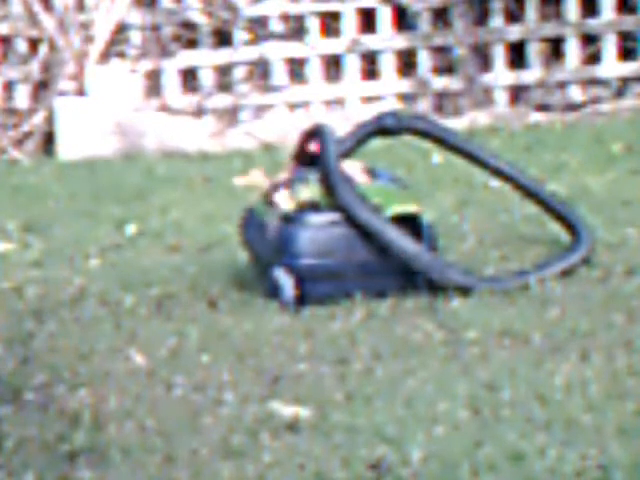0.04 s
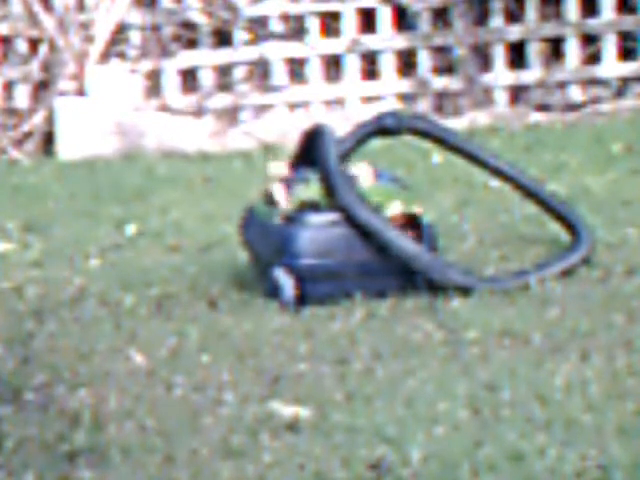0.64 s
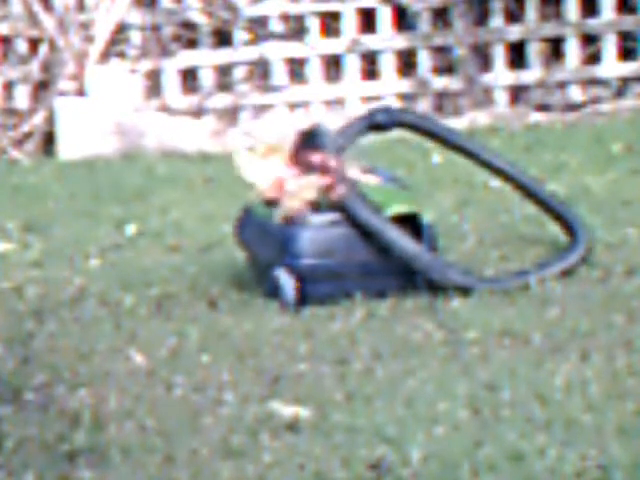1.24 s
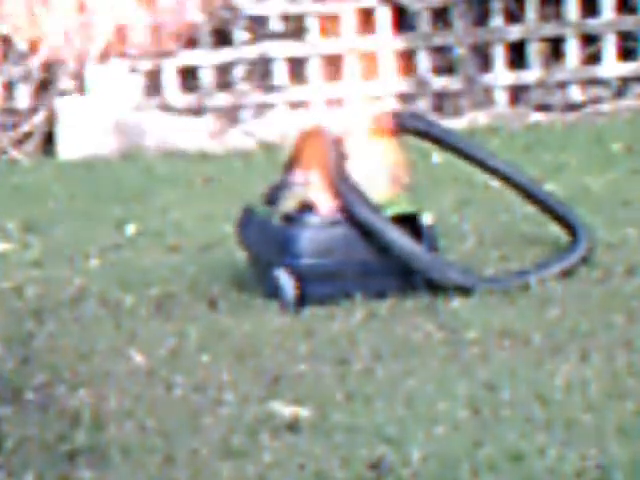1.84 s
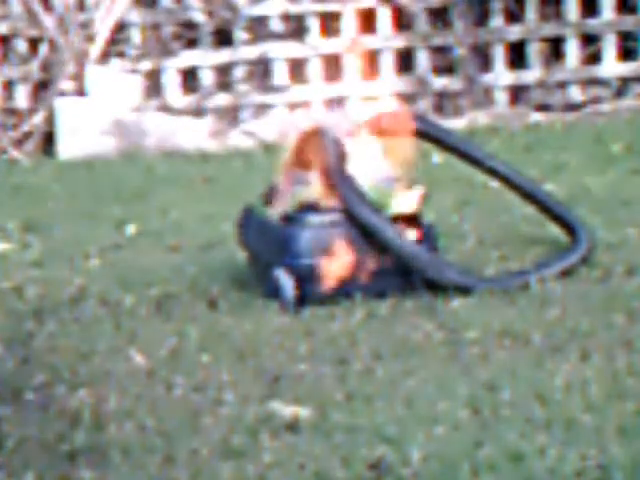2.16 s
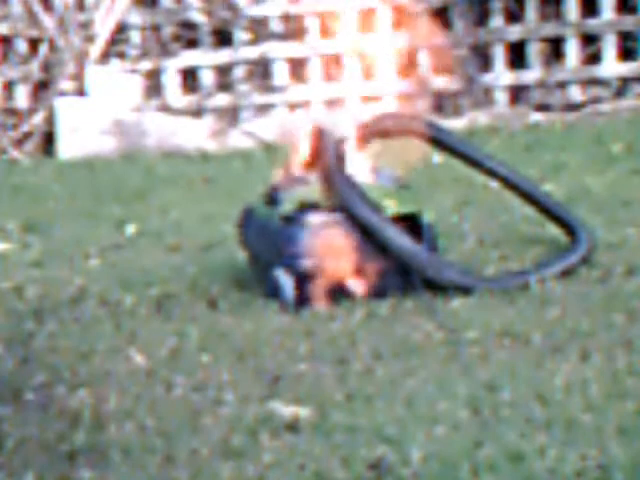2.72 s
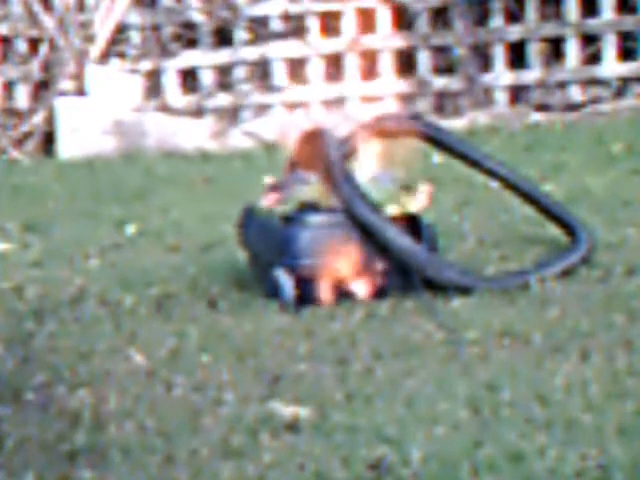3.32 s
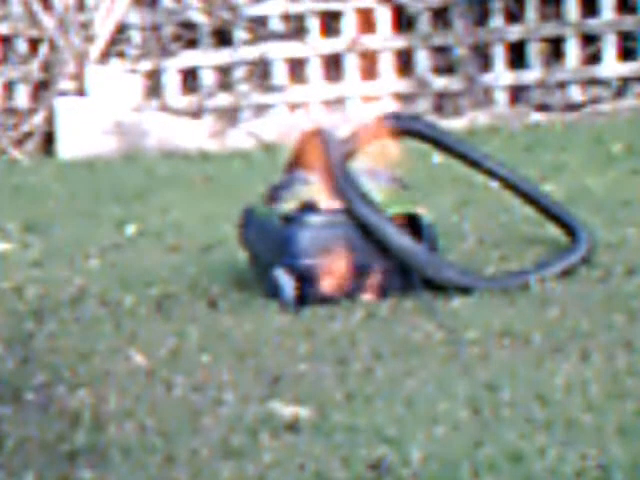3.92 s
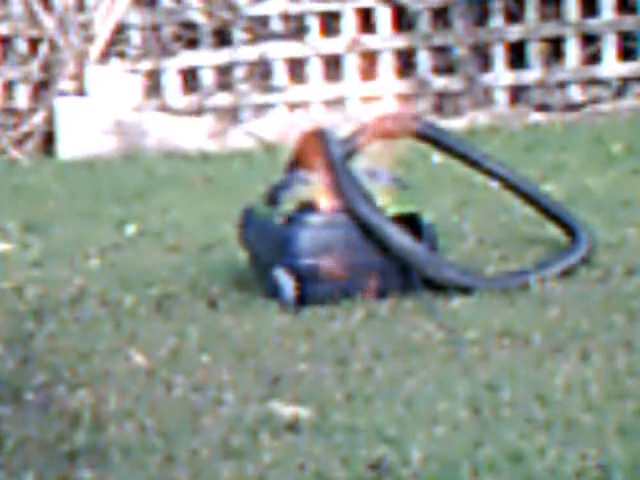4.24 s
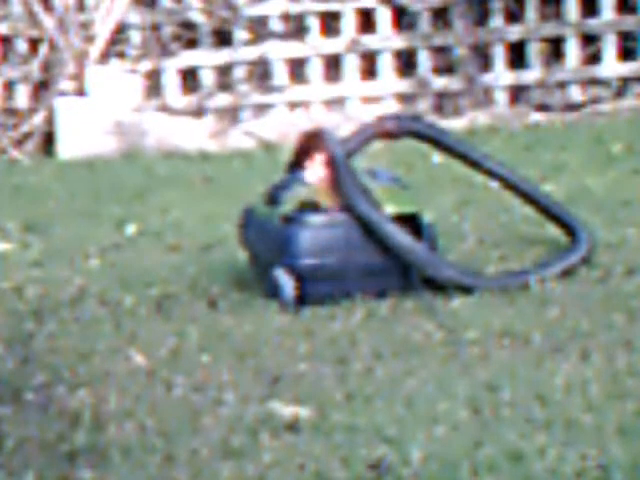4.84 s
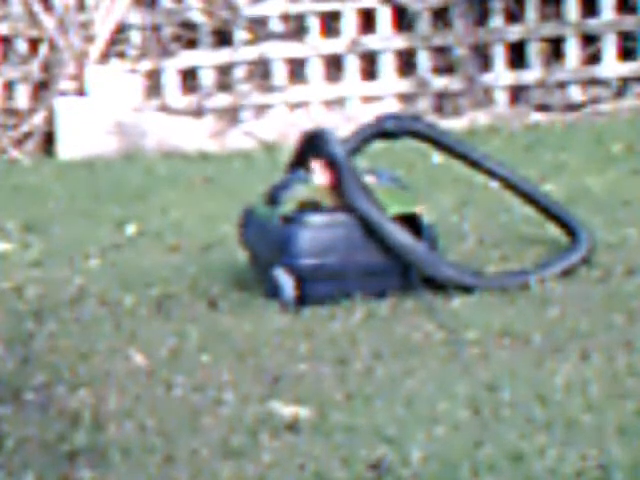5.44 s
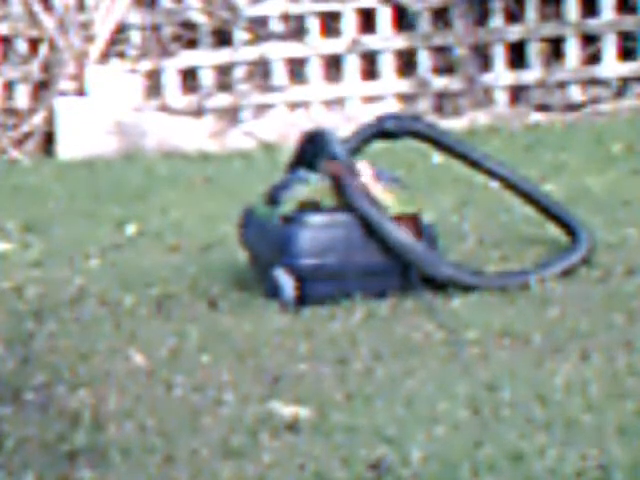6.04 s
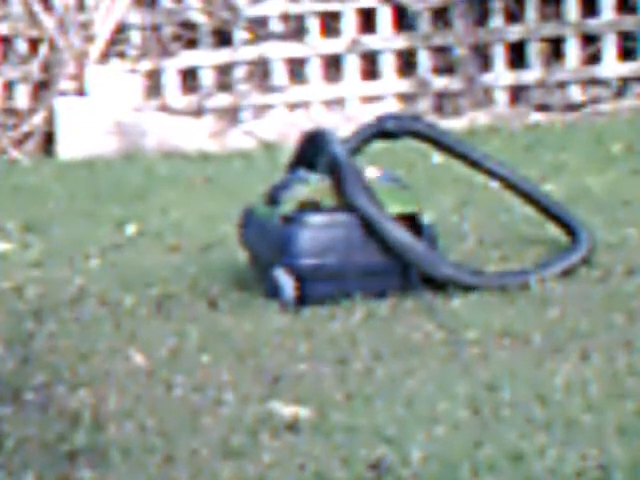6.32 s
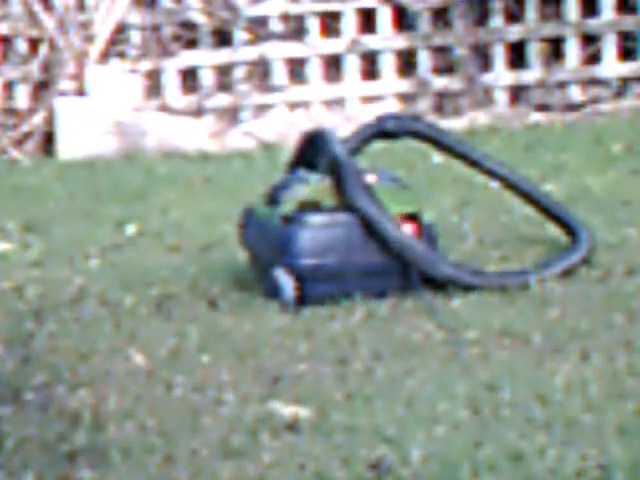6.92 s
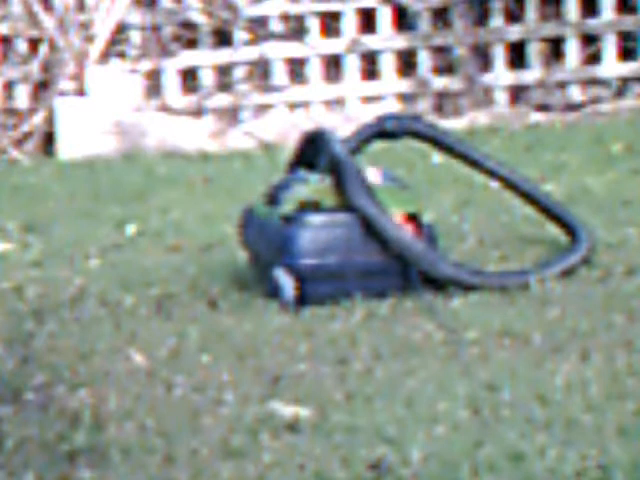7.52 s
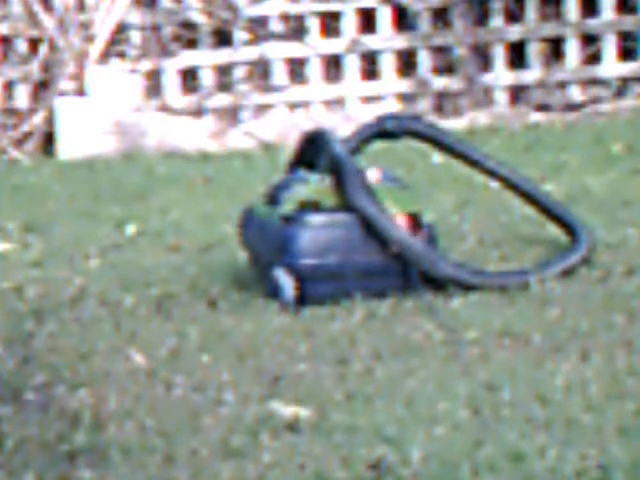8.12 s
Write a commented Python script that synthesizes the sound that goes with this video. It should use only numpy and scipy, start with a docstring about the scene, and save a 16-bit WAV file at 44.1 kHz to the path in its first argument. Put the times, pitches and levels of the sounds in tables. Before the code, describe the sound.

On a quiet lawn, a vacuum cleaner gives a small, sharp plastic pop and its motor winds up to a thin whine, with air rushing through the hose. Burning vapour swells twice into a low, buffeting roar, with hissing gas and a few soft whumps. The fire dies away while the motor keeps running. A small camera microphone adds a gritty fizz to the dry sound.

```python
"""Burning petrol vapour roars, low and buffeting, in a vacuum cleaner that has sucked it in on a lawn.
After a small pop the motor winds up, air rushes through the hose and the draught fans the flame.
Gas hisses at the opening, pockets of vapour catch with soft whumps, and the fire dies away while
the motor whines on. A quiet garden bed lies underneath. A small camera's low sample rate, with
each sample held, puts a gritty fizz on top."""
import sys
import numpy as np
from scipy import signal
from scipy.io import wavfile
from scipy.ndimage import uniform_filter1d

SR = 44100
rng = np.random.default_rng(int(sys.argv[2]) if len(sys.argv) > 2 else 0)


def materialize(psi):
    """Save the field psi as 16-bit PCM at rate SR to the path in sys.argv[1].

    A 1-D psi becomes a single channel; in a 2-D psi each row is a channel.
    """
    bounded = np.clip(np.atleast_2d(psi).T, -1, 1)
    quanta = np.round(bounded * 32767).astype(np.int16)
    wavfile.write(sys.argv[1], SR, quanta)


N = 360297


def from_db(db):
    """Decibels to gain."""
    return 10 ** (np.asarray(db) / 20)


def unit_rms(x):
    """Scale to rms 1."""
    return x / np.sqrt(np.mean(x ** 2) + 1e-20)


def envelope(rows, before=None):
    """Straight lines through (time, value) rows; before is the value ahead of the first row."""
    times, values = np.transpose(rows)
    return np.interp(np.arange(N) / SR, times, values, left=before)


def drift(rate_hz):
    """Smooth random modulation, rms about 1."""
    step, run_in = 40, 2000
    pole = np.exp(-2 * np.pi * rate_hz * step / SR)
    white = rng.standard_normal(N // step + run_in + 2)
    slow = signal.lfilter([1], [1, -2 * pole, pole * pole], white)[run_in:]
    return np.interp(np.arange(N) / step, np.arange(len(slow)), unit_rms(slow))


def resonate(x, hz, width_hz):
    """A resonant band-pass with gain 1 at its peak."""
    r, w = np.exp(-np.pi * width_hz / SR), 2 * np.pi * hz / SR
    return signal.lfilter(np.array([1, 0, -1]) * (1 - r * r) / 2, [1, -2 * r * np.cos(w), r * r], x)


def ring(clicks, hz, t60):
    """A unit click sets off a decaying sine of height 1."""
    r, w = np.exp(-np.log(1000) / (t60 * SR)), 2 * np.pi * hz / SR
    return signal.lfilter([0, np.sin(w)], [1, -2 * r * np.cos(w), r * r], clicks + 1e-18)


def narrow_noise(hz, width_hz):
    """Pitched noise: two passes through one resonance, rms 1."""
    return unit_rms(resonate(resonate(rng.standard_normal(N), hz, width_hz), hz, width_hz))


def eddies(spectrum, flicker_db, flicker_hz, tilt_db=0, bass_db=0, pivot_hz=80, bass_hz=55):
    """Quarter-octave noise bands, each flickering alone, with a tilt per octave and a bass shelf."""
    edges = np.geomspace(18, 2900, 30)
    points_hz, points_db = np.transpose(spectrum)
    white = rng.standard_normal((2, N + SR // 2))
    out, power = 0, 0
    for k, (low, high) in enumerate(zip(edges, edges[1:])):
        hz = np.sqrt(low * high)
        band_pass = signal.butter(3, [low, high], "band", fs=SR, output="sos")
        band = signal.sosfilt(band_pass, white[k % 2])[-N:]
        band *= from_db(np.interp(np.log(hz), np.log(points_hz), points_db))
        octaves = np.clip(np.log2(hz / pivot_hz), -1, 2)
        colour_db = tilt_db * octaves + bass_db * (hz < bass_hz)
        out += band * from_db(flicker_db * drift(flicker_hz) + colour_db)
        power += np.mean(band ** 2)
    return out / np.sqrt(power)


# Spectrum of the outdoor bed: f/Hz, relative density/dB
GARDEN_SPECTRUM = [(12, -33), (20, -10), (43, 3), (60, -7.5), (130, -1), (205, -9), (343, -11.5),
                   (373, -17), (405, -7.5), (540, -9), (611, -8), (721, -14.5), (1210, -23), (2190, -24),
                   (2750, -26.5), (3580, -69), (6050, -120)]
# Envelope of a faint drone, strongest at the start: t/s, level/dB
DRONE_ENVELOPE = [(0, -52), (.28, -48.5), (.6, -58), (1, -61), (2, -56), (2.6, -69)]


def garden(bed_db=-43.5):
    """A soft, dark outdoor bed with a narrow, hollow drone."""
    drone = from_db(envelope(DRONE_ENVELOPE)) * narrow_noise(hz=541, width_hz=66)
    return from_db(bed_db) * eddies(GARDEN_SPECTRUM, flicker_db=-0.55, flicker_hz=5.5) + drone


def scatter(x, level_db=-21, t60=.18):
    """Fence and shrubs throw back a faint, dense tail."""
    t = np.arange(SR // 2) / SR
    tail = rng.standard_normal(len(t)) * np.exp(-np.log(1000) * t / t60)
    return from_db(level_db) * signal.fftconvolve(x, tail / np.linalg.norm(tail))[:N]


# Pop cues: t/s, snap level/dB, knock level/dB
POP_CUES = [(.229, -41.5, -45), (1.631, -33, -70), (1.6339, -16.5, -60), (1.6375, -21, -60),
            (1.6485, -37, -36), (1.687, -40, -40), (2.156, -49, -25.5), (2.179, -40, -50)]
# Modes of the plastic shell: f/Hz, relative level/dB, t60/s
SHELL_MODES = [(1016, -6.5, 0.033), (1170, -0.5, 0.02), (1470, -9, 0.0073), (2200, 3.5, 0.01),
               (2580, -21, .008)]


def pops(low_cut_hz=720):
    """Each pop snaps in the thin plastic shell and knocks the hollow drum behind it."""
    snaps, knocks = np.zeros((2, N))
    for at_s, snap_db, knock_db in POP_CUES:
        at = round(at_s * SR)
        snaps[at], knocks[at] = from_db(snap_db), from_db(knock_db)
    shell = sum(from_db(db) * ring(snaps, hz, t60) for hz, db, t60 in SHELL_MODES)
    # a small shell radiates no bass
    shell = signal.sosfilt(signal.butter(4, low_cut_hz, "high", fs=SR, output="sos"), shell)
    return shell + ring(knocks, hz=570, t60=0.06)


def motor_speed(on_s=1.63, spin_up_s=.545):
    """Share of full speed: a quick climb after switch-on, then levelling off."""
    return 1 - np.exp(-np.maximum(np.arange(N) / SR - on_s, 0) / spin_up_s)


# Tones of motor and fan at full speed: f/Hz, relative level/dB
MOTOR_TONES = [(1066, -64), (1938, -61.5), (2353, -74), (2540, -64), (3200, -60)]
# Casing resonances that lift a tone as it sweeps through: f/Hz, width/Hz, boost/dB
CASING_RESONANCES = [(738, 78, 21), (1550, 40, 12), (1820, 39, 12), (1970.5, 37, 13)]


def motor(level_db=-1.0, strain_db=2.0, wobble=0.00342, rough_db=3.0, sing_speed=.585):
    """The whine rises with speed, is louder under the strain of winding up, and rings the casing."""
    speed, whine = motor_speed(), 0
    travel = np.cumsum(speed * (1 + wobble * drift(20.1))) / SR
    for full_hz, db in MOTOR_TONES:
        lift_db = sum(boost_db / (1 + ((full_hz * speed - hz) / width) ** 2)
                      for hz, width, boost_db in CASING_RESONANCES)
        whine += from_db(db + lift_db + rough_db * drift(30)) * np.sin(2 * np.pi * full_hz * travel)
    # the tones break out as the motor passes sing_speed
    singing = .5 + .5 * np.tanh((speed - sing_speed) / 0.011)
    return np.sqrt(2) * from_db(level_db + strain_db * (1 - speed)) * singing * whine


# Air columns of hose and drum: f/Hz, width/Hz, relative level/dB
HOSE_RESONANCES = [(54.7, 9.4, 4.5), (83.5, 9.1, 2), (117, 5.5, 2), (272.6, 22.5, 3.5), (360.2, 7.7, 6.5),
                   (468, 21, -1), (578, 14, -11), (681, 29, -2), (801, 16, -36)]


def hose(x):
    """The hollow colour that hose and drum add to a sound passing through."""
    return sum(from_db(db) * resonate(x, hz, width) for hz, width, db in HOSE_RESONANCES)


# Resonances of the opening: f/Hz, width/Hz, relative level/dB
OPENING_RESONANCES = [(1026, 34, -6), (1393, 300, -0.5), (1908, 460, 2.5), (2165, 116, -4.5),
                      (2525, 230, -7)]
# Envelope of the burning gas's hiss: t/s, level/dB
HISS_ENVELOPE = [(2.08, -76), (2.16, -57), (2.4, -48), (2.68, -36.5), (3.15, -46.5), (3.65, -47.5),
                 (4.58, -36), (5.7, -42.5), (6.3, -62.5), (7.6, -56)]


def gas_hiss():
    """Burning gas hisses in the resonances of the opening."""
    hiss = sum(from_db(db) * narrow_noise(hz, width) for hz, width, db in OPENING_RESONANCES)
    return from_db(envelope(HISS_ENVELOPE, before=-120)) * unit_rms(hiss)


def warmth(warming_s=0.84):
    """The machine's heat lags behind the burning gas."""
    gas = from_db(envelope(HISS_ENVELOPE, before=-120))
    pole = np.exp(-1 / (warming_s * SR))
    return signal.lfilter([1 - pole], [1, -pole], gas)


# Spectrum of the air rush: f/Hz, relative density/dB
AIR_SPECTRUM = [(30, 4.5), (60, -15), (150, -1.5), (200, -5), (290, -2), (450, -2.5), (620, -2.5),
                (880, -4), (1020, -15), (1180, -18.5), (1400, -10), (1700, -14), (1980, -8), (2750, -16)]


def airflow(suction_db=-38.5, speed_power=1.47, updraught_db=1.0, hose_db=-4, flutter_db=0.95):
    """Motor and heat draw air through hose and fan; the rush and the gas hiss flutter together."""
    air = eddies(AIR_SPECTRUM, flicker_db=0.97, flicker_hz=21)
    air += from_db(hose_db) * hose(air)
    suction = from_db(suction_db) * motor_speed() ** speed_power
    draught = np.hypot(suction, from_db(updraught_db) * warmth())
    rush = draught * air + gas_hiss()
    return from_db(flutter_db * drift(58)) * rush


# Bass-heavy spectrum of the fire: f/Hz, relative density/dB
FIRE_SPECTRUM = [(18, -30), (28, -2), (38, -2.5), (52, -1), (125, -3.5), (165, -5.5), (220, -12),
                 (310, -18.5), (430, -21.5), (550, -26), (700, -33), (1000, -36), (1150, -40.5),
                 (2750, -72)]


def rumble(tilt_db, bass_db=0, hose_db=-2.5, window_s=.12):
    """Turbulent burning, coloured by the hose; slow swells are levelled out, the fast grain stays."""
    roar = eddies(FIRE_SPECTRUM, flicker_db=.5, flicker_hz=8.8,
                  tilt_db=tilt_db, bass_db=bass_db, pivot_hz=83)
    roar += from_db(hose_db) * hose(roar)
    power = np.abs(uniform_filter1d(roar ** 2, int(window_s * SR)))
    return roar / np.sqrt(power + 1e-9)


# Whump cues: peak t/s, level/dB, swell width/s, tilt/(dB per octave)
WHUMP_CUES = [(1.0, -48.5, .25, 2.5), (2.355, -18, 0.046, -4), (3.79, -17, .05, -6), (5.27, -14, .06, -8),
              (6.69, -36, .1, 4)]


def whumps(fade_ratio=1.4):
    """Pockets of vapour catch: each swells, fades a little more slowly and has its own colour."""
    t, power, weighted_tilt = np.arange(N) / SR, 1e-12, 0
    for peak_s, db, swell_s, tilt_db in WHUMP_CUES:
        width_s = np.where(t < peak_s, swell_s, swell_s * fade_ratio)
        bell = (from_db(db) * np.exp(-.5 * ((t - peak_s) / width_s) ** 2)) ** 2
        power += bell
        weighted_tilt += tilt_db * bell
    return np.sqrt(power) * rumble(weighted_tilt / power)


# Envelope of the roar, which swells twice and burns out: t/s, relative level/dB
ROAR_ENVELOPE = [(1.63, -68), (1.72, -43), (2.05, -37), (2.24, -30), (2.38, -18.5), (2.78, -13),
                 (3.02, -14.5), (3.22, -20), (4.0, -12), (4.45, -11), (5.0, -14.5), (5.7, -21.5),
                 (6.07, -29), (6.4, -55)]


def flame(level_db=-0.5, calm_bass_db=2.5, bass_loss_db=7, neutral_gap_db=27.5, tilt_per_db=0.1358):
    """The roar is deep and dull while the gas is calm and brightens as rushing gas tears at it."""
    roar_db, hiss_db = envelope(ROAR_ENVELOPE, before=-120), envelope(HISS_ENVELOPE)
    # the more hiss beside the roar, the brighter the flame
    tilt_db = tilt_per_db * (hiss_db - roar_db + neutral_gap_db)
    # a fierce hiss breaks up the largest eddies and thins the deep bass
    bass_db = calm_bass_db - bass_loss_db * from_db(hiss_db - hiss_db.max())
    return from_db(roar_db + level_db) * rumble(tilt_db, bass_db)


def scene():
    """A dry, open-air mono mix; only the pops get a tail."""
    popping = pops()
    return (flame() + whumps() + airflow() + motor() + popping + scatter(popping) + garden())[None]


def record(dry, hold=8, anti_alias_hz=2745, cutoff_hz=15750):
    """Sample-and-hold grit: the steps mirror the low-passed sound up into the treble."""
    dull = signal.sosfilt(signal.butter(8, anti_alias_hz, fs=SR, output="sos"), dry)
    steps = np.repeat(dull[:, ::hold], hold, axis=1)[:, :N]
    return signal.sosfilt(signal.ellip(12, .1, 100, cutoff_hz, fs=SR, output="sos"), steps)


dry = scene()
out = record(dry)
materialize(out)
```